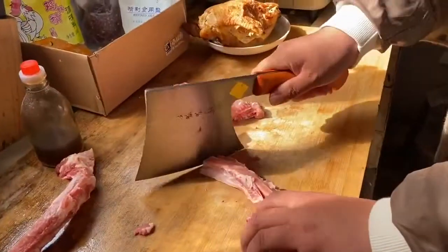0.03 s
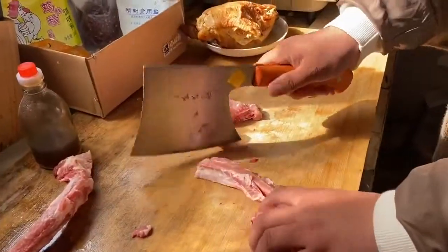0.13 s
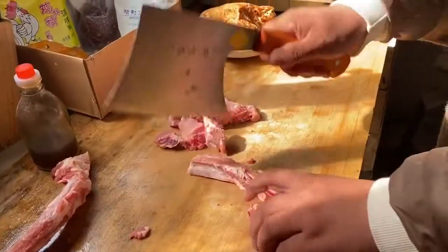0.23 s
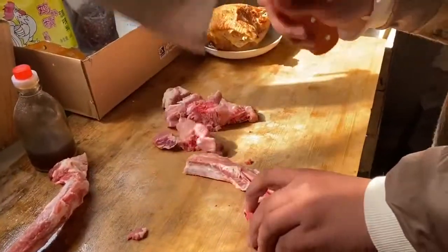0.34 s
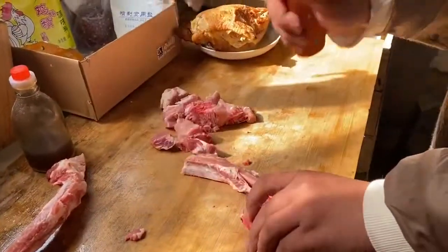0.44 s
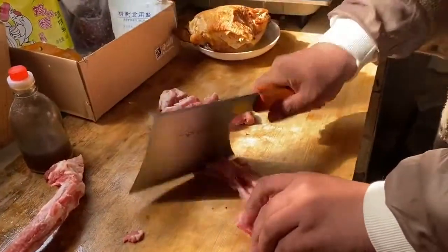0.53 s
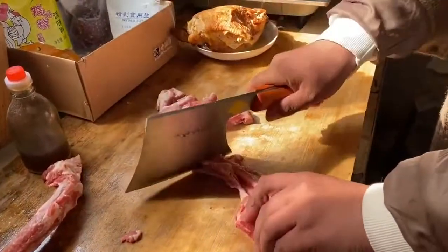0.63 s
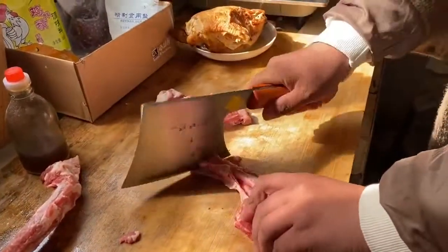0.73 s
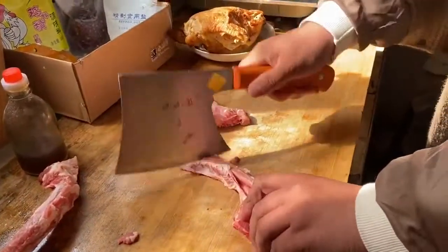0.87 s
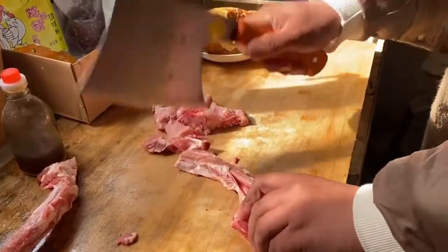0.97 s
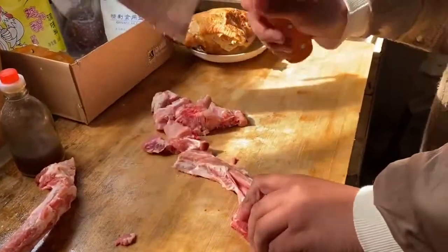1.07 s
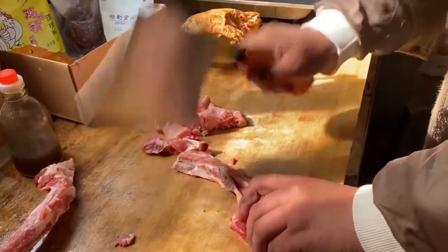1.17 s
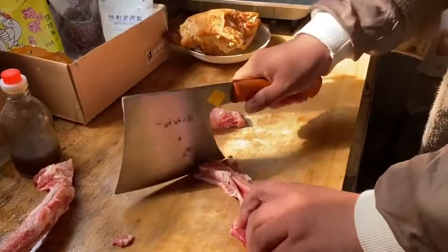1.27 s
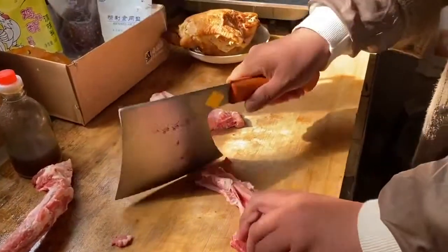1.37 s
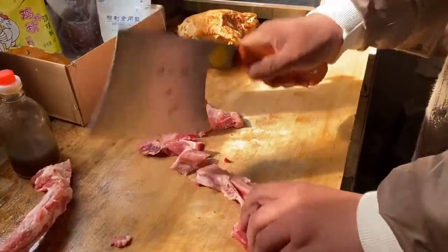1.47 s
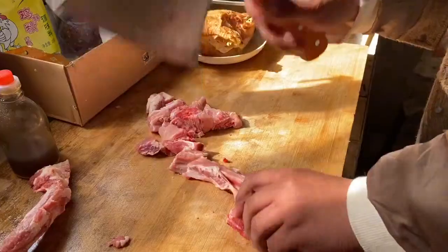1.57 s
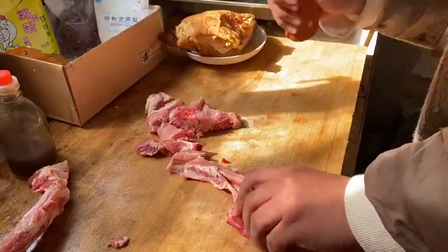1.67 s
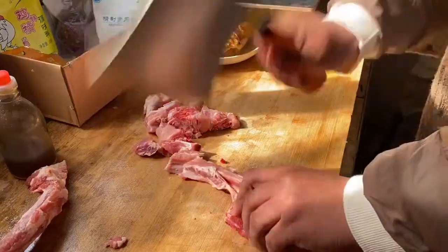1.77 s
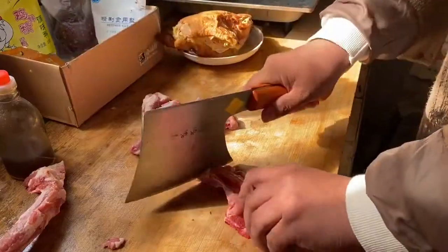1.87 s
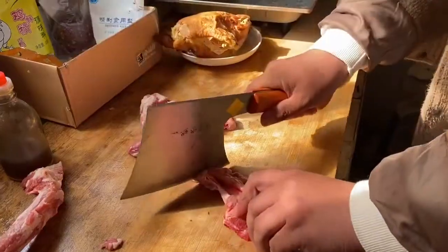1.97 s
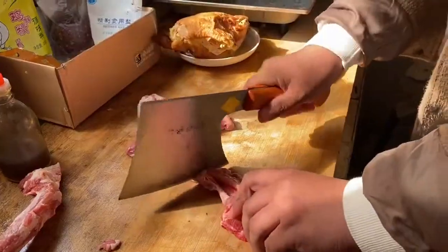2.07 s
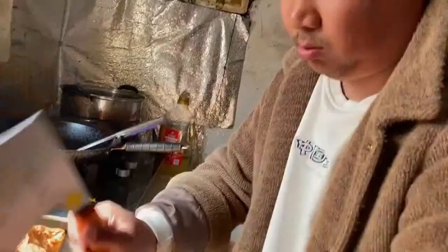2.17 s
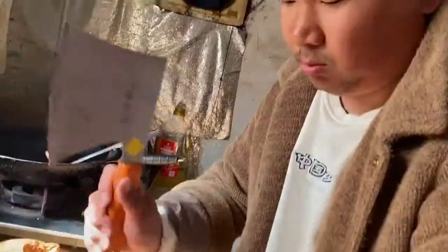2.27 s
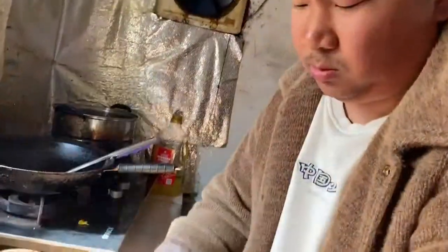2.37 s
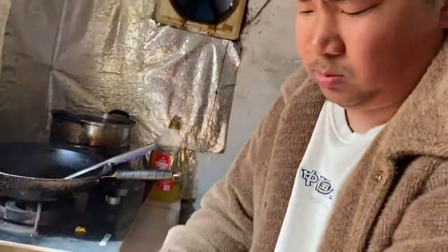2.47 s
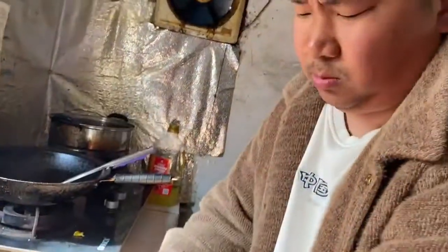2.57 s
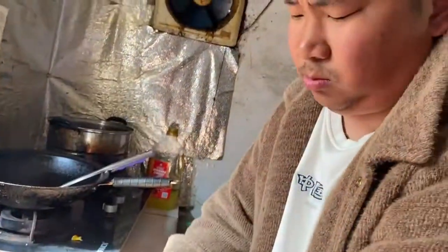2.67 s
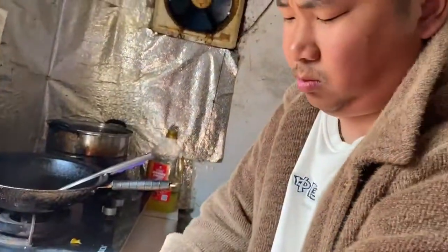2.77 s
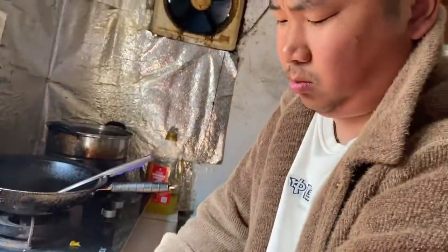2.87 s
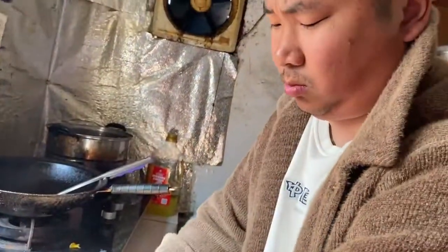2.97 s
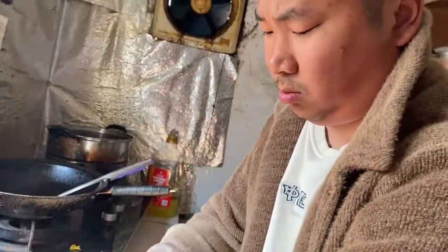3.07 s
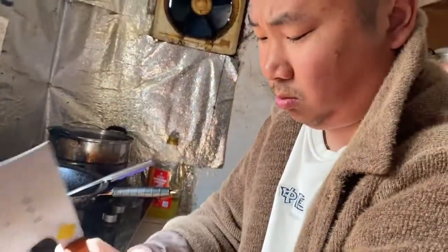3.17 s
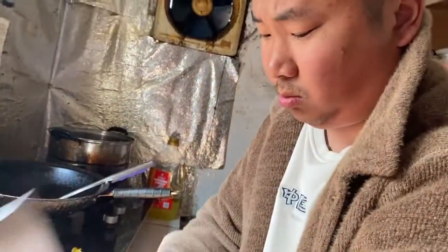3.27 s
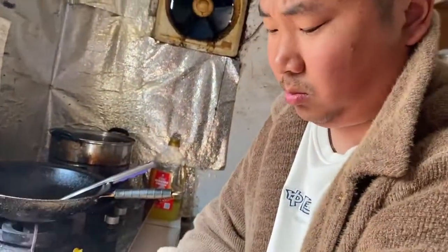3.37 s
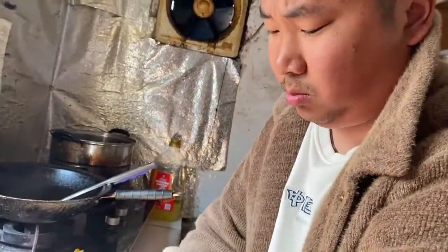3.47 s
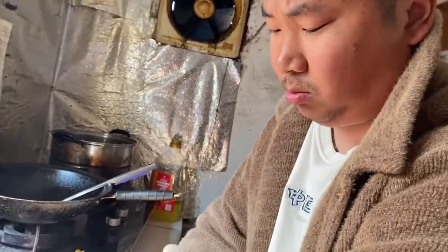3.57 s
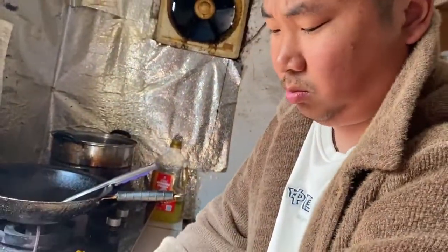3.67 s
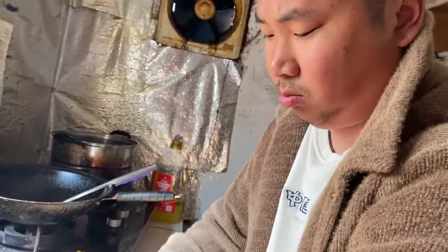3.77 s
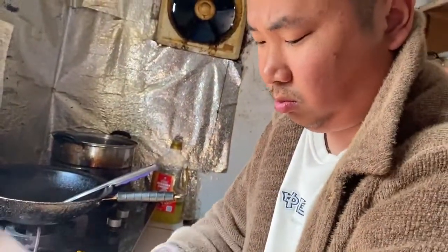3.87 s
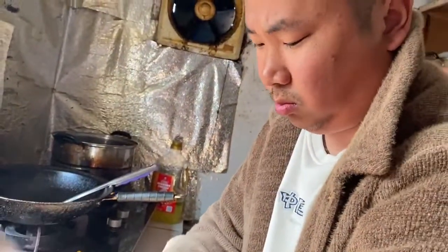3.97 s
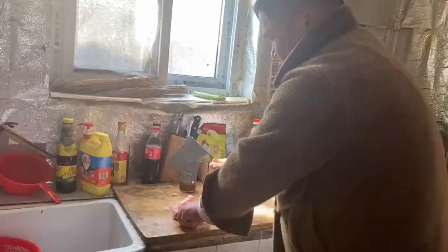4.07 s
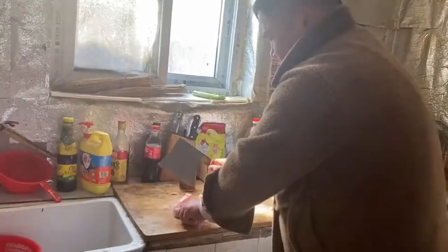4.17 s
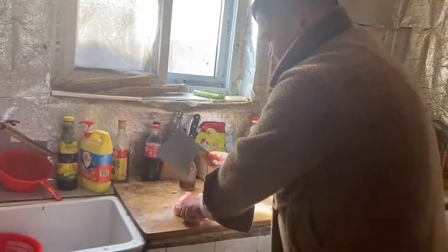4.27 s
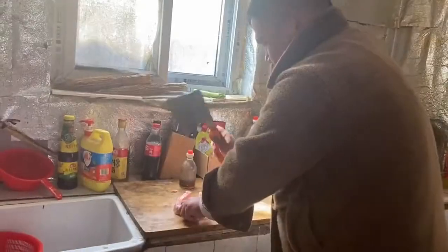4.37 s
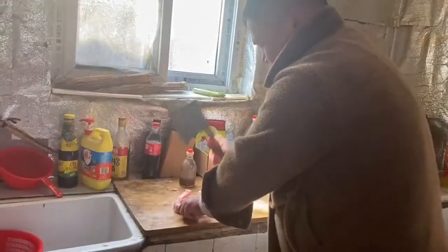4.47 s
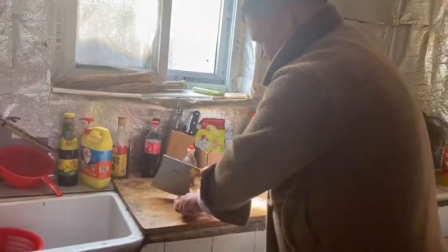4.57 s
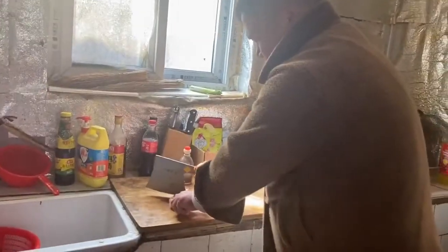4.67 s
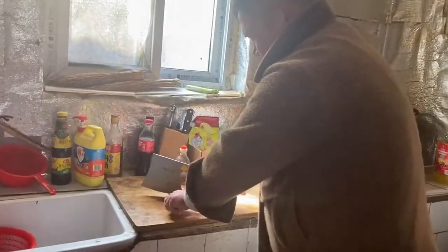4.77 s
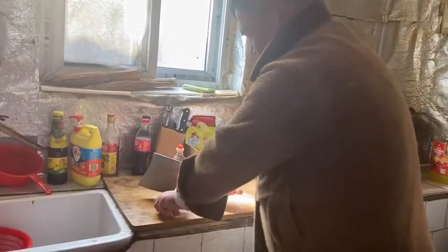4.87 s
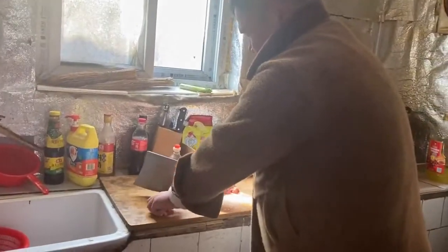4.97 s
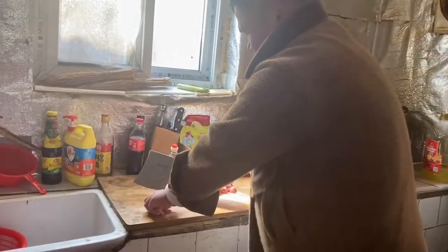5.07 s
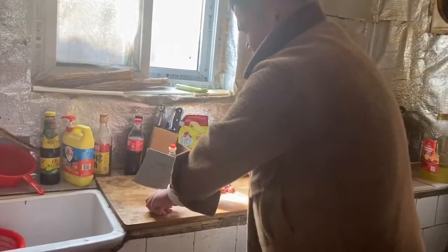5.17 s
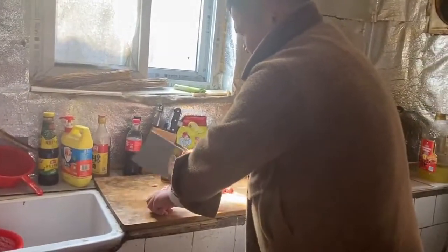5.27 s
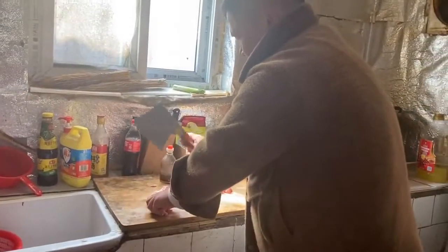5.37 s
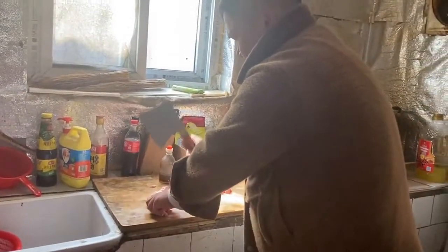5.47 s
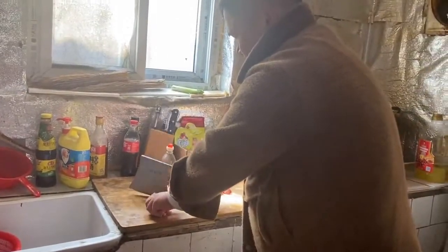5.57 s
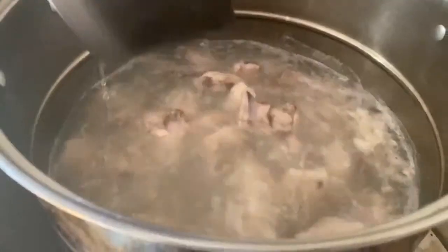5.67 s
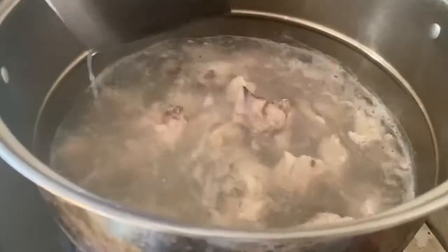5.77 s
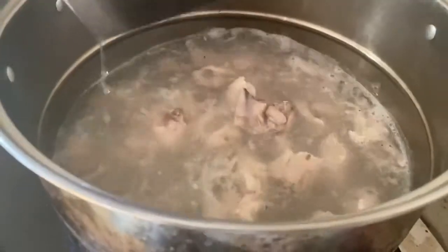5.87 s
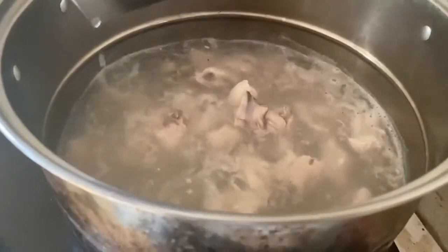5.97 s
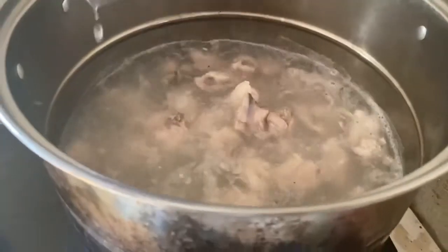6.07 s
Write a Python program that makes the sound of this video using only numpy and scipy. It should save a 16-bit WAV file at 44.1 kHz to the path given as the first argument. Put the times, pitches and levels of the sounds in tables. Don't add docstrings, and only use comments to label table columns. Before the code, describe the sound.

In a small, slightly reverberant kitchen, a heavy cleaver chops pork ribs on a wooden board, heard close on a phone. Each blow is a deep woody thud with a sharp crunch of bone and a short steel clack, with near quiet between. The view moves behind the cook, with louder room hum and duller blows, then cuts abruptly to a pot boiling with low, thumping bubbles.

```python
import sys
import numpy as np
from scipy import signal
from scipy.fft import rfft, irfft, next_fast_len
from scipy.io import wavfile
from scipy.ndimage import uniform_filter1d

SR = 44100
rng = np.random.default_rng(int(sys.argv[2]) if len(sys.argv) > 2 else 0)


def transcribe(signal):
    frames = np.atleast_2d(signal).T
    limited = np.clip(frames, -1, 1)
    pcm = np.round(limited * 32767).astype(np.int16)
    wavfile.write(sys.argv[1], SR, pcm)


def rack_gain(trim_db):
    fader = np.asarray(trim_db, float)
    return 10 ** (fader / 20)


N = 269583

VIEW_TIMES = [0, 4.172, 5.707, 7]
# t/s, deep board level/dB, board knock level/dB, blade level/dB, bone snap level/dB
CHOPS = [
    (-0.084, -16.5, -14.5, -17.5, -32),
    (0.634, -16, -16.5, -15, -26.5),
    (1.3, -10.5, -10, -12.5, -28.5),
    (1.903, -12, -12.5, -11.5, -22.5),
    (2.495, -16, -11.5, -13, -20),
    (3.415, -12.5, -9, -12.5, -22),
    (4.117, -14, -10.5, -12, -27),
    (4.623, -9, -14.5, -16.5, -18.5),
    (4.877, -32.5, -35.5, -33.5, -24),
    (5.637, -8, -15.5, -11.5, -23.5),
]
# t/s, deep board level/dB, board knock level/dB, blade level/dB
REBOUNDS = [
    (.651, -21, -17, -26.5),
    (.704, -29.5, -26.5, -29),
    (1.977, -32.5, -25, -34.5),
    (3.518, -32.5, -34, -50),
    (4.695, -36.5, -32, -52),
    (5.525, -66, -42.5, -48),
]
# f/Hz, level/dB, t60/s
BOARD_SIDE = [(202, -14, .08), (224, -13, 0.019), (281.4, 3, .09), (356, -3.5, 0.071), (351.9, 1.5, 0.013),
              (472, 0, 0.072), (519, 0, 0.017), (670, -2.5, 0.015), (673, -0.5, .04), (767, 2, 0.052),
              (858, -2.5, .04), (930, 3, .035), (1090, -5.5, 0.013), (1134, -6, 0.041), (1274.6, -6, .03)]
BOARD_BEHIND = [(212.7, -16, 0.078), (286, -11, 0.056), (335, -5, 0.023), (420, 0, 0.11), (481, 5.5, 0.071),
                (600, 3.5, 0.064), (763, -4, 0.044), (763, -11, 0.06), (970, -4, 0.038), (1040, -1, 0.028),
                (1360, 3, 0.0072), (1540, 0, 0.033)]
# f/Hz, level/dB, t60/s
TABLE = [(71.38, 6, 0.58), (98.4, 2, 1), (126, -5, 0.9), (143, -18.5, 0.26)]
# f/Hz, level/dB, t60/s
HELD_BLADE = [(1650, 0.5, 0.015), (1793, -6, 0.036), (2210, -2, 0.013), (2620, 4.5, 0.03),
              (2590, -5.5, 0.019), (2700, -2.5, .02), (3310, -7.5, 0.004), (3880, -5, 0.0062),
              (4510, -7, .03)]
FREE_BLADE = [(3085, -7, .9), (4505, 0, .28), (4830, -1, .26), (5690, 4, .16), (7000, -5, .1)]
# f/Hz, level/dB per Hz
SPLINTERS = [(710, -30.5), (1200, -27), (1940, -16), (2640, -12.5), (3220, -11), (7410, -14.5), (8830, -24),
             (11400, -17.5), (15300, -24.5), (16500, -34.5)]
# t/s, centre f/Hz, spread/share, t60/s, level/dB
RATTLES = [
    (1.908, 2666, .025, 0.029, -16),
    (2.5, 2697, .05, .015, -19.5),
    (4.64, 644, .25, 0.34, -21.5),
    (5.522, 1040, 0.0726, 0.5, -39.5),
]
# t/s, level/dB, favoured f/Hz, fall-off away from it/dB per octave
TOUCHES = [
    (.185, -72, 5700, 6),
    (2.2, -64, 4830, 60),
    (2.945, -75, 4500, 60),
    (3.045, -64, 4830, 6),
    (3.22, -73, 3085, 30),
    (3.8, -61, 5700, 9),
    (4.879, -38, 4480, 120),
]
# t/s, length/s, centre f/Hz, width/Hz, level/dB
PUSHES = [(.165, 0.043, 2350, 2900, -64.5), (1.55, .13, 2800, 1550, -63), (2.08, 0.12, 2000, 2000, -69),
          (2.22, 0.054, 1160, 600, -61), (2.28, 0.063, 1465, 2502, -64), (3.68, 0.0459, 1518, 1514, -63.5),
          (3.77, 0.044, 3200, 2000, -67.5), (4.349, 0.004, 9150, 12100, -53.5),
          (4.885, 0.067, 5900, 9990, -33.5), (5.53, 0.034, 1950, 400, -46.5), (5.53, 0.18, 2480, 2970, -58),
          (4.098, 0.035, 1010, 900, -30.5), (.947, 0.0038, 10060, 11000, -64),
          (2.66, .003, 10000, 11000, -63.5), (5.624, 0.016, 2170, 1820, -30.5),
          (5.13, 0.011, 10900, 9000, -56.5), (5.235, .004, 11000, 7000, -61)]
# t/s, length/s, f/Hz
CLINKS = [
    (5.302, .09, 2206),
]
# t/s, level/dB
GLUGS = [
    (5.735, -34),
    (5.875, -39),
    (6.019, -33),
    (6.055, -38),
]
# f/Hz, level/dB per Hz
BOIL = [(15, -42), (25, -19.5), (97, 4.5), (339, -23.5), (510, -28), (584, -26), (1320, -35.5), (6730, -35),
        (9070, -35), (11600, -31.5), (13300, -40), (14800, -30), (16500, -60)]
HUM = [(15, -56), (25, -23), (135, -3), (421, -27), (831, -29), (1390, -36.5), (2150, -41), (7300, -46.5),
       (9070, -51), (11300, -43), (13300, -62.5), (14800, -42.5), (16500, -72)]
QUIET = [(30, -24), (62, -1), (100, 4), (160, -9), (260, -7), (400, -12), (500, -17), (630, -20.5),
         (1000, -17.5), (1400, -28), (2000, -26.5), (3200, -34.5), (6500, -33), (16000, -37.5)]
# f/Hz, width/Hz, level/dB
FAN_TONES = [(260, 5.9, 5.5), (410, 4, 7), (480, 21, 9), (950, 37, 0)]
# f/Hz, t60/s
KITCHEN = [(60, 0.18), (160, 0.29), (420, 0.23), (1100, 0.19), (2910, 0.14), (7680, 0.12), (13000, 0.1)]
# f/Hz, share
PORT_LIKENESS = [(60, .99), (150, .97), (350, .92), (900, .55), (1600, .4), (3000, .45), (6000, .4),
                 (12000, .35)]
# f/Hz, phase/rad; in the high treble they come near opposite
LEFT_LEAD = [(50, .2), (300, .35), (900, 1.2), (1500, 1.5), (2500, .6), (4500, .1), (8000, 1.4),
             (12000, 2.2)]
# f/Hz, level/dB
LEFT_TILT = [(60, 2.0), (110, 2.5), (200, 1.0), (380, 1.5), (700, 3.0), (1290, 3.0), (2380, 0.5),
             (4400, 1.0), (8120, 0.0), (15000, 0.0)]
# from f/Hz, to f/Hz
GAPS = [(8450, 9750), (12750, 13750), (15750, 22050)]

BOIL_DB, HUM_DB, QUIET_DB = -32.5, -42, -59


def chop(board, wetter_db, deep_db, knock_db, blade_db, splinter_db, table_db, crunch_s=0.018):
    cracks_per_s = 2500
    u = np.arange(2000) / (SR * crunch_s)
    luck = rng.random((2000, 3))
    cracks = (luck[:, 0] < cracks_per_s / SR) * np.sign(luck[:, 1] - .5)
    cracks *= rack_gain(-4 * np.log(luck[:, 2] + 0.014))
    cracks *= np.minimum(u / 0.17, 1) * np.exp(-u ** 3)

    def struck(modes, longest, wet_db):
        body = signal.fftconvolve(cracks, ring(modes, longest=longest))
        return kitchen(body, wet_db + wetter_db, ring(modes, longest=longest * 0.14))

    deep = struck(split(board, 0, 560), 0.084, wet_db=-6)
    knock = struck(split(board, 560, 2000), .03, wet_db=-6)
    bite = struck(HELD_BLADE, .015, wet_db=-4.5)
    shatter = (cracks + 0.4 * rng.standard_normal(2000)) * np.exp(-u / 0.5)
    splinters = kitchen(shaped(np.pad(shatter, (40, 2000)), SPLINTERS), wet_db=-5)
    weight = np.exp(-u / 0.17) * np.minimum(u / 0.11, 1)
    table = signal.fftconvolve(weight, ring(TABLE, spread=0.0071, longest=0.54))
    table = kitchen(table, wet_db=-20.5, near_db=-22.5)
    bodies = [at_peak(deep, deep_db), at_peak(knock, knock_db), at_peak(bite, blade_db - 5.0),
              at_peak(splinters, splinter_db + 2.0), at_peak(table, table_db)]
    return sum(np.pad(body, ((0, 0), (0, 2 * SR)))[:, :SR] for body in bodies)


def bone_chop(s, deep_db, knock_db, blade_db, snap_db):
    table_db = min(snap_db + 1.5, deep_db - 7.5)
    table_db -= 3.5 * (s > VIEW_TIMES[1])
    return chop(*board_view(s), deep_db, knock_db, blade_db, snap_db, table_db)


def rebound(s, deep_db, knock_db, blade_db):
    return chop(*board_view(s), deep_db, knock_db, blade_db, splinter_db=blade_db - 29,
                table_db=knock_db - 15.5, crunch_s=.008)


def board_view(s):
    return (BOARD_SIDE, 0) if s < VIEW_TIMES[1] else (BOARD_BEHIND, 4)


def ring(modes, spread=.025, longest=0.89):
    t = np.arange(round(1.3 * longest * SR)) / SR
    total = np.zeros(len(t))
    for hz, level_db, t60 in modes:
        detune, sign = rng.uniform(-1, 1, 2)
        envelope = rack_gain(level_db - 60 * t / np.clip(t60, .002, longest))
        total += envelope * np.sin(2 * np.pi * hz * (1 + spread * detune) * t) * np.sign(sign)
    return total


def split(modes, lo, hi):
    return [mode for mode in modes if lo <= mode[0] < hi]


def rattle(hz, spread, t60, db, chatter_s=0.0057, steady=0.14):
    modes = ring([(hz, 0, t60)] * 16, spread=spread)
    chatter = evened(uniform_filter1d(rng.standard_normal(len(modes)), round(chatter_s * SR)))
    broad = ring([(hz, 0, .004)], spread=0)
    return at_peak(kitchen(modes * (steady + chatter), -2.0, broad if t60 < .05 else None), db)


def touch(db, favoured_hz, away_db, above_db=70):
    modes = []
    for hz, level_db, t60 in FREE_BLADE:
        slope_db = away_db + above_db * (hz > favoured_hz)
        modes.append((hz, level_db - slope_db * abs(np.log2(hz / favoured_hz)), t60))
    return at_peak(kitchen(ring(modes, spread=.001, longest=1), wet_db=-9, near_db=-14), db - 3)


def push(length, hz, width_hz, db):
    size = round(length * SR)
    luck = rng.random((8000, 2))[:size]
    slips = (luck[:, 0] < .15) * (luck[:, 1] - .5) * signal.windows.tukey(size, .6)
    edges = [max(hz - width_hz / 2, 200), min(hz + width_hz / 2, 18000)]
    band = signal.butter(2, edges, "band", fs=SR, output="sos")
    return at_peak(kitchen(signal.sosfilt(band, slips), wet_db=-4.0), db)


def clink(length, hz, db=-65, t60=1.0):
    t = np.arange(round(length * SR)) / SR
    damped = np.minimum((length - t) / .02, 1)
    return at_peak(kitchen(np.sin(2 * np.pi * hz * t) * rack_gain(-60 * t / t60) * damped, wet_db=-9), db)


def boiling_pot(t):
    fizz_db, fizz_s = 6, 0.058
    simmer_db, rise_s, fall_s = -37.5, 0.0104, 0.042
    boil = rack_gain(BOIL_DB + fizz_db * np.exp(-abs(t - VIEW_TIMES[2]) / fizz_s)) * air(BOIL, patchy_db=2.0)
    low = signal.sosfiltfilt(signal.butter(2, 320, fs=SR, output="sos"), boil)
    thump = rack_gain(simmer_db)
    for s, db in GLUGS:
        thump = thump + rack_gain(db) * np.exp(-abs(t - s) / np.where(t < s, rise_s, fall_s))
    return boil + low * (thump / rack_gain(BOIL_DB) - 1)


def room_hum(t):
    sag_db_per_s = 2
    return rack_gain(HUM_DB - sag_db_per_s * (t - VIEW_TIMES[1])) * air(HUM, patchy_db=0.5)


def background():
    t = np.arange(N) / SR
    quiet = rack_gain(QUIET_DB) * air(QUIET, patchy_db=.7, tones=FAN_TONES)
    return np.select([t < VIEW_TIMES[1], t < VIEW_TIMES[2]], [quiet, room_hum(t)], boiling_pot(t))


def air(points, patchy_db, tones=()):
    frames, hz = N // 512 + 5, np.fft.rfftfreq(2048, 1 / SR)
    a, b, c, d, patches = rng.standard_normal((frames, 1025, 5)).T
    patches = evened(uniform_filter1d(uniform_filter1d(patches, 16, 0), 6, 1))
    colour_db = read(points, hz)
    for f, width, db in tones:
        colour_db = colour_db + db / (1 + ((hz - f) / width) ** 2)
    z = np.array([a + 1j * b, c + 1j * d]) * rack_gain(colour_db[:, None] + patchy_db * patches)
    return evened(signal.istft(z, nperseg=2048, noverlap=1536)[1][:, :N])


def kitchen(x, wet_db=-6, all_round=None, near_s=0.0042, near_db=-4, far_db=-11, far_slower=1.84):
    size = SR // 2
    age = np.arange(size) / SR
    taps = np.zeros((2, size))
    start = np.arange(0, size - 12, 12)
    at = start + rng.integers(0, 12, (2, len(start)))
    np.put_along_axis(taps, at, rng.choice([-1., 1.], at.shape), 1)
    near = taps * np.exp(-age / near_s)
    near *= rack_gain(near_db) / np.linalg.norm(near[0])
    near[0, 0] = 1
    near[1] *= np.linalg.norm(near[0]) / np.linalg.norm(near[1])
    hz, t, z = signal.stft(taps, SR, nperseg=512)
    fall_db = -60 * t / np.maximum(read(KITCHEN, hz), .03)[:, None]
    fall = rack_gain(fall_db) + rack_gain(far_db + fall_db / far_slower)
    tail = signal.istft(z * fall, SR, nperseg=512)[1][:, :size]
    fed = x
    if all_round is not None:
        fed = np.pad(all_round, (0, len(x)))[:len(x)] * np.linalg.norm(x) / np.linalg.norm(all_round)
    tail *= 1 - np.exp(-age / 0.0023)
    tail *= rack_gain(wet_db) / np.linalg.norm(tail[0])
    return signal.fftconvolve(x[None], near, axes=1) + signal.fftconvolve(fed[None], tail, axes=1)


def ports(paths):
    size = next_fast_len(N)
    hz, (a, b) = np.fft.rfftfreq(size, 1 / SR), rfft(paths, size)
    same, tilt = np.clip(read(PORT_LIKENESS, hz), 0, 1), rack_gain(read(LEFT_TILT, hz) / 2)
    right = same * a * np.exp(-1j * read(LEFT_LEAD, hz)) + np.sqrt(1 - same ** 2) * b
    return irfft(np.array([a * tilt, right / tilt]), size)[:, :N]


def evened(x):
    return x / np.sqrt(np.mean(x ** 2) + 1e-20)


def at_peak(x, db):
    return rack_gain(db) * x / np.sqrt(uniform_filter1d((x ** 2).mean(0), 441).max())


def read(points, hz):
    f, value = np.transpose(points)
    return np.interp(np.log(hz + 1), np.log(f + 1), value)


def shaped(x, points):
    size = next_fast_len(x.shape[-1])
    gain = rack_gain(read(points, np.fft.rfftfreq(size, 1 / SR)))
    return irfft(rfft(x, size) * gain, size)[..., :x.shape[-1]]


def add(mix, s, sound):
    at = round(s * SR)
    stop = round(min(c for c in VIEW_TIMES if c > max(s, 0)) * SR)
    part = mix[:, max(at, 0):stop][:, :sound.shape[1] + min(at, 0)]
    part += sound[:, max(-at, 0):][:, :part.shape[1]]


def scene():
    mix = background()
    for table, blow in ((CHOPS, bone_chop), (REBOUNDS, rebound)):
        for s, *levels_db in table:
            add(mix, s, blow(s, *levels_db))
    for table, source in ((RATTLES, rattle), (TOUCHES, touch), (PUSHES, push), (CLINKS, clink)):
        for s, *controls in table:
            add(mix, s, source(*controls))
    return ports(mix)


def phone_rounding(x):
    smear_db, gap_db, attack_gap_db, hole_db = -27, -32, -9, -25
    attack_db, dying_db, edge_hz, holes = 14, 5, 8300, .45
    hz, t, z = signal.stft(x, SR, window="cosine", nperseg=2048)
    grain = uniform_filter1d(abs(z), 9, 1) * np.exp(2j * np.pi * rng.random(z.shape))
    z = z + rack_gain(smear_db) * grain * ((hz < edge_hz) & (hz > 400))[:, None]
    x = signal.istft(z, SR, window="cosine", nperseg=2048)[1]
    hz, t, z = signal.stft(x, SR, nperseg=512)
    high = (hz > edge_hz)[:, None]
    treble_db = 10 * np.log10((abs(z[:, hz > edge_hz]) ** 2).sum((0, 1)) + 1e-14)
    rise_db = treble_db - np.roll(treble_db, 3)
    attack = np.clip(rise_db / attack_db - .5, 0, 1)
    dropped = sum((hz > lo) & (hz < hi) for lo, hi in GAPS)
    dying = np.clip(-rise_db / dying_db, 0, 1)
    patch = rng.random((len(t) // 4 + 1, len(hz) // 7 + 1)).repeat(4, 0).repeat(7, 1)
    patch = patch[:len(t), :len(hz)].T
    z = z * np.where((patch < holes * dying) & high, rack_gain(hole_db), 1 + holes * dying * high)
    gaps = rack_gain(np.outer(dropped, gap_db + attack * (attack_gap_db - gap_db)))
    return signal.istft(z * gaps, SR, nperseg=512)[1][:, :N]


def band_limit(x):
    return signal.sosfilt(signal.butter(12, 16640, fs=SR, output="sos"), x)


def record(dry):
    heard = signal.sosfilt(signal.butter(2, 50, "high", fs=SR, output="sos"), dry)
    heard = signal.oaconvolve(heard, signal.firwin(255, 16600, fs=SR)[None], "same")
    limited = heard / (1 + (abs(heard) / .95) ** 4) ** .25
    finished = phone_rounding(limited)
    return band_limit(finished)


dry = scene()
out = record(dry)
transcribe(out)
```